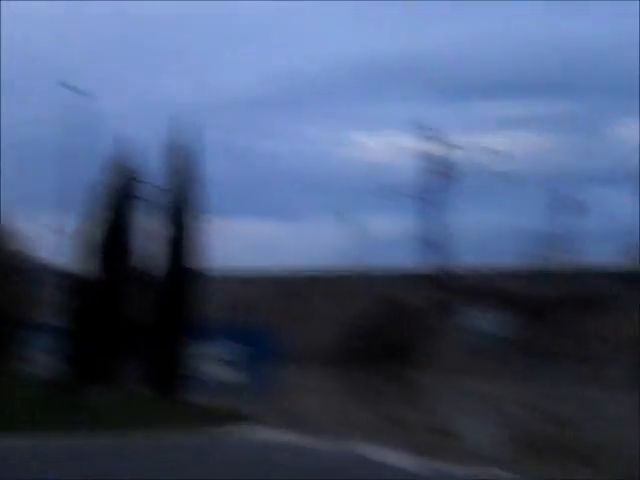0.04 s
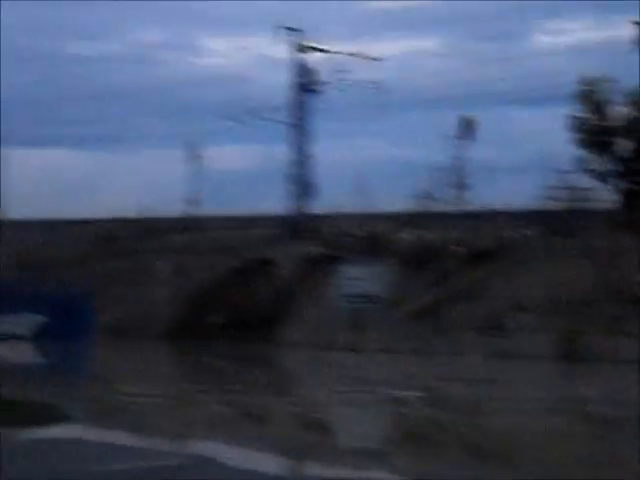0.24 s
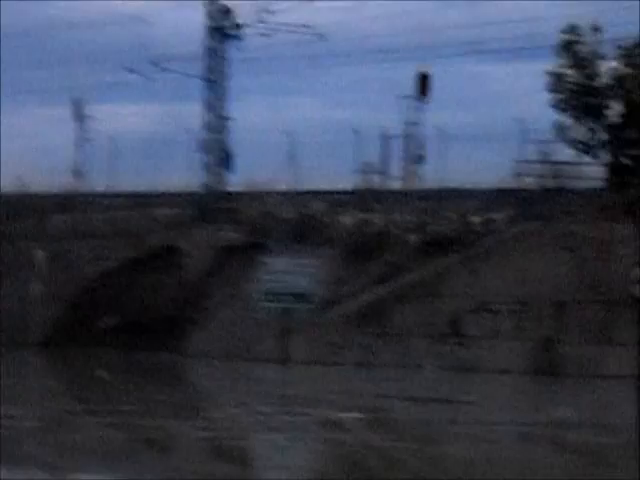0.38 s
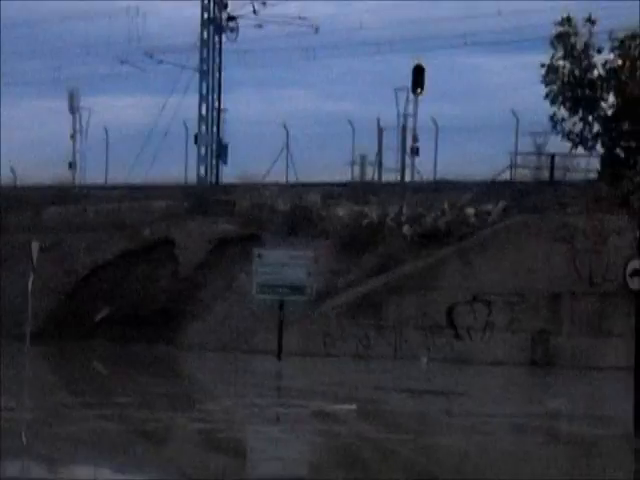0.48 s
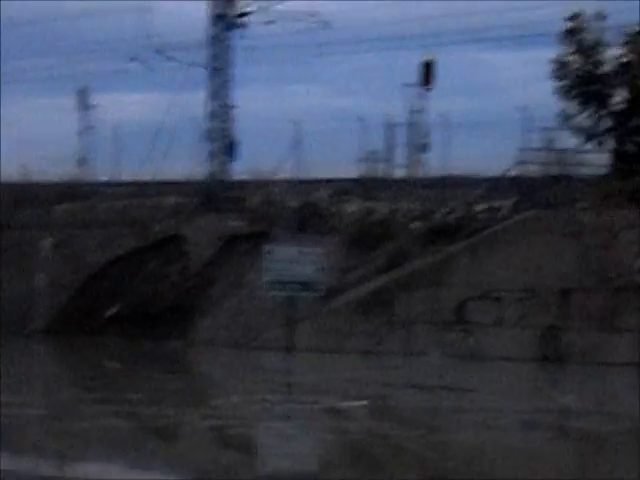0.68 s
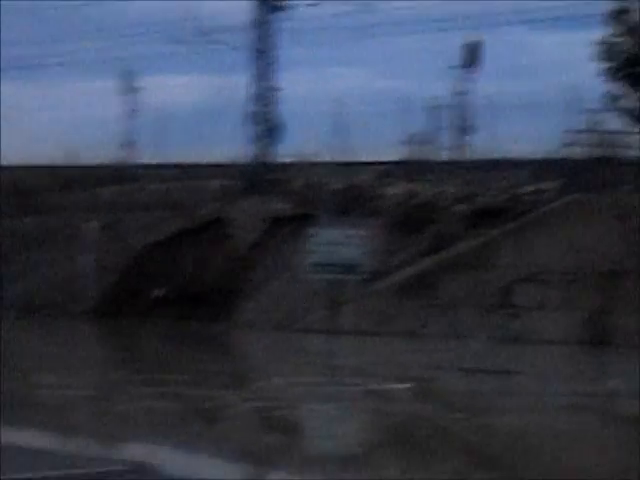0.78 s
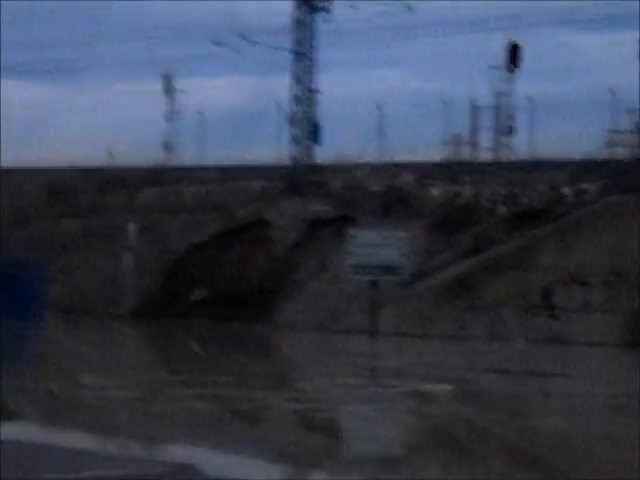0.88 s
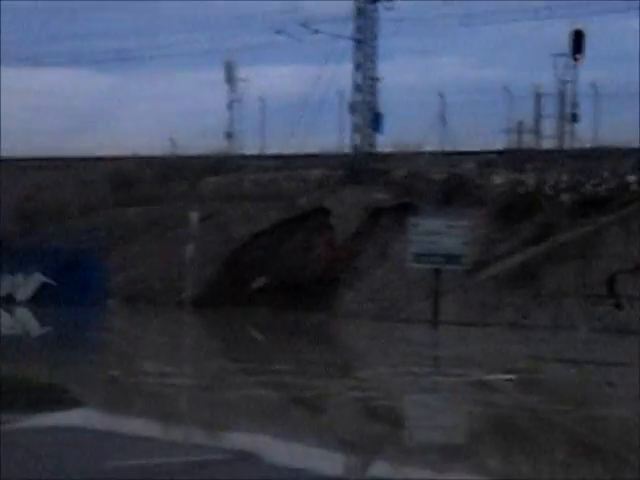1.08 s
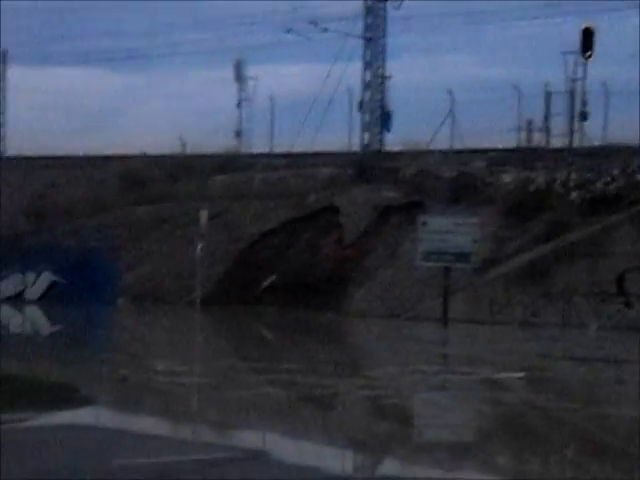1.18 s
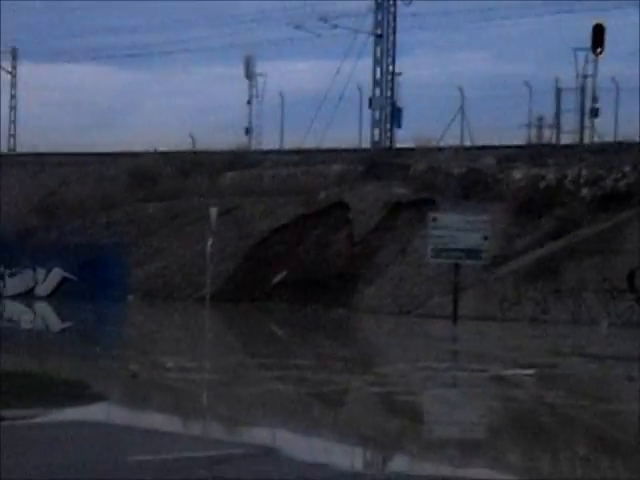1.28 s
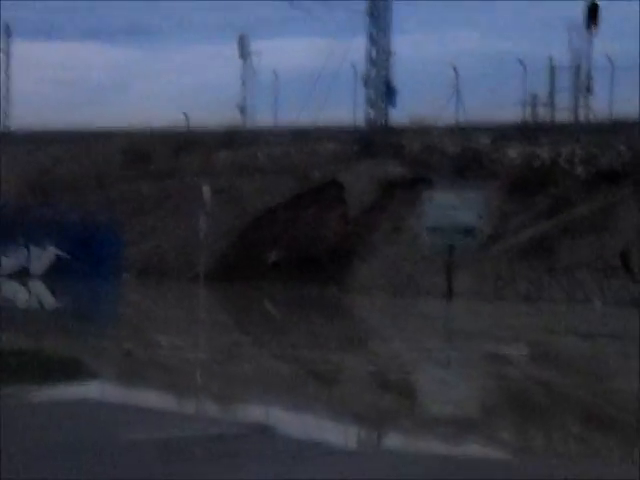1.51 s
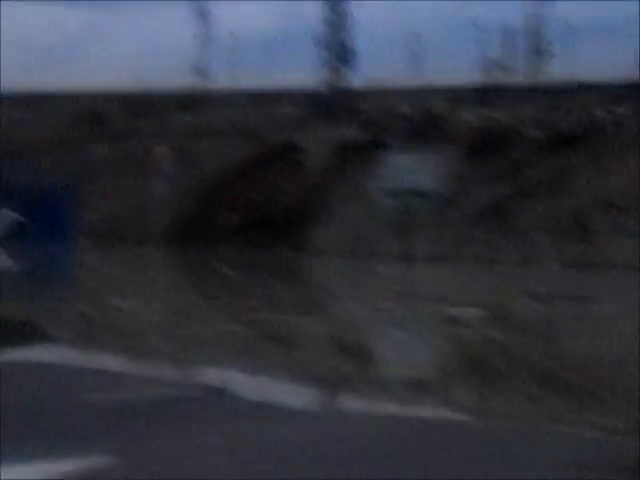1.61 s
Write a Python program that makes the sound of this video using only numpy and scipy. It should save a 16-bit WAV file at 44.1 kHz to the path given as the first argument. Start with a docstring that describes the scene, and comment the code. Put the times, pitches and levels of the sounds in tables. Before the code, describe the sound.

A handheld camera clicks twice right at the microphone, hard and slightly distorted, the second click ringing briefly. Behind it, a dull, steady outdoor wash continues beside a flooded road, with a faint low drone like a distant engine.

```python
"""Dusk beside a flooded road

A hand-held camera's microphone hears a steady far wash of outdoor noise and a low drone, probably a
distant engine. A faint whine passes. Right at the microphone, over a thin whistle, the camera clicks
twice and its case rings briefly. The narrow-band recorder overloads on both clicks."""
import sys
import numpy as np
from scipy import signal
from scipy.io import wavfile
from scipy.ndimage import uniform_filter1d

SR = 44100
rng = np.random.default_rng(int(sys.argv[2]) if len(sys.argv) > 2 else 0)


def to_wav(sig):
    """Store sig (one row per channel, or 1-D mono) as 16-bit WAV at the path in sys.argv[1].

    Samples outside -1..1 are clipped; the rate is SR.
    """
    pcm = np.clip(np.atleast_2d(sig), -1, 1) * 32767
    pcm = np.round(pcm).astype(np.int16)
    wavfile.write(sys.argv[1], SR, pcm.T)  # frames by channels


N = 72765
T = np.arange(N) / SR
KNOCK_RISE_S, CASE_RISE_S = 0.00077, 0.0094


def amp(db):
    """Decibels to gain."""
    return 10 ** (np.asarray(db) / 20)


def unit(x):
    """Scales to rms 1."""
    return x / np.sqrt(np.mean(x ** 2) + 1e-20)


def add(mix, s, sound):
    """Mixes a sound in at time s."""
    part = mix[round(s * SR):][:len(sound)]
    part += sound[:len(part)]


def drift(t, rate_hz):
    """Slow random motion of rms 1, up to the given rate."""
    hz = np.geomspace(rate_hz / 10, rate_hz, 20)
    return unit(sum(np.sin(2 * np.pi * (f * t + rng.random())) for f in hz))


def lowpass(x, hz, taps):
    """Steep low-pass."""
    return signal.oaconvolve(x, signal.firwin(taps, hz, window=("kaiser", 9), fs=SR), "same")


def far_tone(curve, waver, flutter_db, rate_hz, partials=((1, 0),)):
    """A far tone whose pitch and level waver on the way to the microphone."""
    s, hz, db = np.transpose(curve)
    pitch = np.interp(T, s, hz) * (1 + waver * drift(T, rate_hz))
    turns = np.cumsum(pitch) / SR
    level = amp(np.interp(T, s, db, right=-np.inf) + flutter_db * drift(T, rate_hz))
    wave = sum(amp(part_db) * np.sin(2 * np.pi * k * turns) for k, part_db in partials)
    return np.sqrt(2) * level * wave


def far_wash():
    """Outdoor noise from far off, with soft drifting patches and a slight swell."""
    # spectrum of the wash: f/Hz, relative level/dB
    spectrum = [(12, -10), (30, 2), (48, 1), (85, -1.5), (120, -5.5), (160, -6.5), (300, -6.5), (430, -9),
                (800, -10.5), (1080, -9), (1400, -17), (1900, -22), (2800, -24), (3800, -26)]
    f, db = np.transpose(spectrum)
    frames, hz = N // 512 + 5, np.fft.rfftfreq(2048, 1 / SR)
    shape_db = np.interp(np.log(hz + 1), np.log(f), db)
    real, imag, patches = rng.standard_normal((3, frames, len(hz)))
    patches = uniform_filter1d(patches, size=6, axis=0)  # smooth in time
    patches = unit(uniform_filter1d(patches, size=16, axis=1))  # and in frequency
    swell = drift(np.linspace(0, N / SR, frames), rate_hz=5)[:, None]
    bins = (real + 1j * imag) * amp(shape_db + 0.61 * patches - 0.35 * swell)
    _, noise = signal.istft(bins.T, nperseg=2048, noverlap=1536)
    return amp(-32.5) * unit(noise[:N])


def far_drone():
    """A low, uneven drone, probably an engine in the distance."""
    # course of the drone: t/s, f/Hz, level/dB
    curve = [(0, 65.5, -62), (.4, 62.7, -44.5), (.5, 64.9, -47), (.8, 65.04, -38), (.95, 66.27, -37.5),
             (1.01, 67.7, -47.5), (1.14, 70.05, -38), (1.4, 65.3, -46), (1.65, 65.5, -55)]
    return far_tone(curve, waver=.018, flutter_db=1.0, rate_hz=13)


def far_whine():
    """A faint, distant whine that falls as it passes."""
    # course of the fundamental: t/s, f/Hz, level/dB
    curve = [(.04, 298.6, -60), (.095, 295.1, -43.5), (.15, 290.2, -48.5), (.21, 283, -40.5),
             (.27, 280, -52)]
    # harmonics: multiple, relative level/dB
    partials = [(1, -3), (2, 0)]
    return far_tone(curve, waver=.015, flutter_db=2.5, rate_hz=64, partials=partials)


def whistle():
    """A thin steady whistle at the microphone, probably from the camera's electronics."""
    # steady tone: f/Hz, rms level/dB
    tones = [(3693, -61)]
    return sum(np.sqrt(2) * amp(db) * np.sin(2 * np.pi * hz * T) for hz, db in tones)


def ring(modes, rise_s, tilt_db, delay_s=0):
    """Dying modes set off by one contact; a harder contact favours the high ones (tilt per octave)."""
    t = np.maximum(T[:N // 4] - delay_s, 0)
    hz, db, t60 = np.transpose(modes)[:, :, None]
    level = amp(db + tilt_db * np.log2(hz / 1000) - 60 * t / t60)
    sign = (-1) ** np.arange(len(modes))  # neighbours swing opposite ways
    return (1 - np.exp(-t / rise_s)) * (sign @ (level * np.sin(2 * np.pi * hz * t)))


def rattle(cutoff_hz=2500, t60_s=.028):
    """A brief dull buzz of loose parts after a knock."""
    t = T[:N // 4]
    hiss = rng.standard_normal(len(t))
    dull = unit(signal.lfilter(*signal.butter(1, cutoff_hz, fs=SR), hiss))
    return dull * amp(-60 * t / t60_s)


def thud(start_hz=607.4, sag_hz_per_s=2700, t60_s=0.067):
    """A short hollow note that sinks as it dies."""
    t = T[:N // 4]
    turns = np.cumsum(start_hz - sag_hz_per_s * t) / SR
    envelope = (1 - np.exp(-t / CASE_RISE_S)) * amp(-60 * t / t60_s)
    return envelope * np.sin(2 * np.pi * turns)


def camera_clicks():
    """At the microphone: a hard knock, a quick rebound and a rattle, then the case thuds and rings."""
    # contacts, with a faint one just ahead of the second click:
    # t/s, knock level/dB, tilt/(dB/octave), rebound delay/ms, rebound re knock/dB, thud/dB, ring/dB
    contacts = [(0.2414, 6.5, 1.13, 1.463, -11.5, -12.5, -17), (0.4191, -20, -10, 1.13, -23.5, -50, -40.5),
                (0.4318, 10, -1.15, 1.588, -9, -7, 2)]
    # heavily damped modes of the knock: f/Hz, level/dB, t60/s
    knock_modes = [(114.5, -20, 0.011), (943, 11.5, .0034), (1081, 2, 0.012), (2360, -8, 0.009),
                   (3030, -8.5, 0.0044), (3667, -11, 0.0057)]
    # longer modes of the case: f/Hz, level/dB, t60/s
    case_modes = [(298, -27.5, 0.17), (1782, -19, .12)]
    out = np.zeros(N)
    for s, db, tilt_db, rebound_ms, rebound_db, thud_db, ring_db in contacts:
        knock = ring(knock_modes, KNOCK_RISE_S, tilt_db)
        # the rebound is a lighter, brighter contact
        rebound = amp(rebound_db) * ring(knock_modes, KNOCK_RISE_S, tilt_db + 6, rebound_ms / 1000)
        impact = amp(db) * (knock + rebound + amp(-23) * rattle())
        case = amp(ring_db) * ring(case_modes, CASE_RISE_S, tilt_db=0) - amp(thud_db) * thud()
        add(out, s, impact + case)
    return out


def scene():
    """Drone, whine and wash far away; whistle and clicks at the microphone. Mono."""
    return (far_drone() + far_whine() + far_wash() + whistle() + camera_clicks())[None]


def record(dry):
    """The recorder passes a narrow band, then overloads, which gives the clicks their only treble."""
    ceiling, knee = 0.98, 60  # a nearly hard clip
    narrow = lowpass(dry[0], hz=3825, taps=341)
    clipped = narrow / (1 + abs(narrow / ceiling) ** knee) ** (1 / knee)
    return lowpass(clipped, hz=16500, taps=301)[None]


dry = scene()
out = record(dry)
to_wav(out)
```